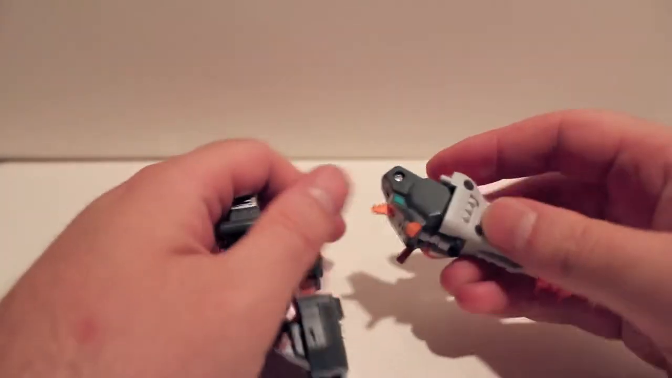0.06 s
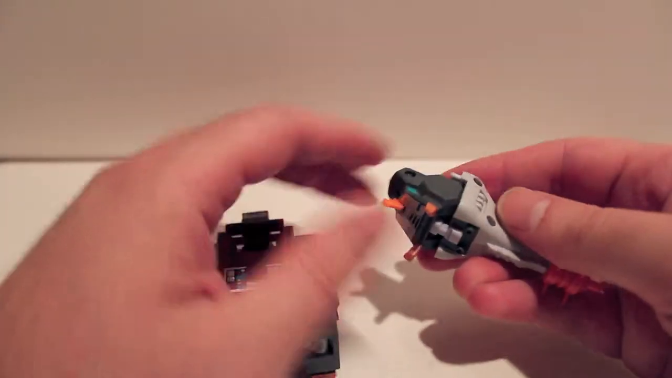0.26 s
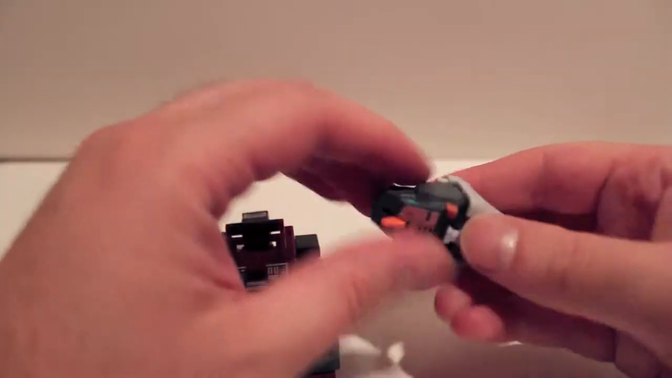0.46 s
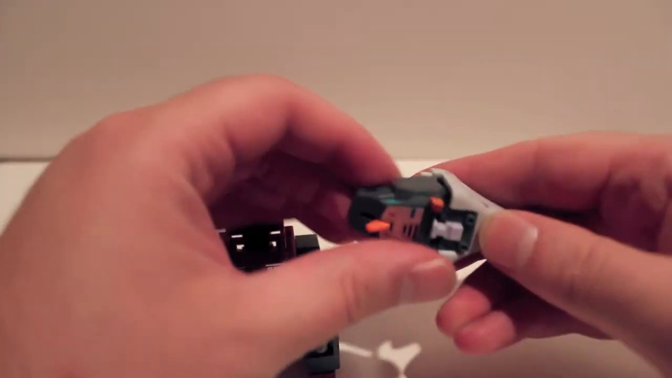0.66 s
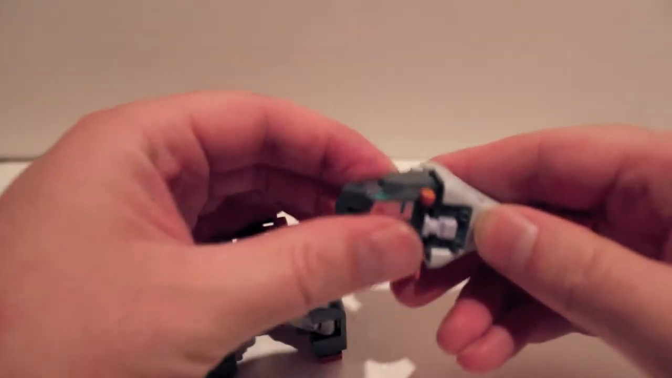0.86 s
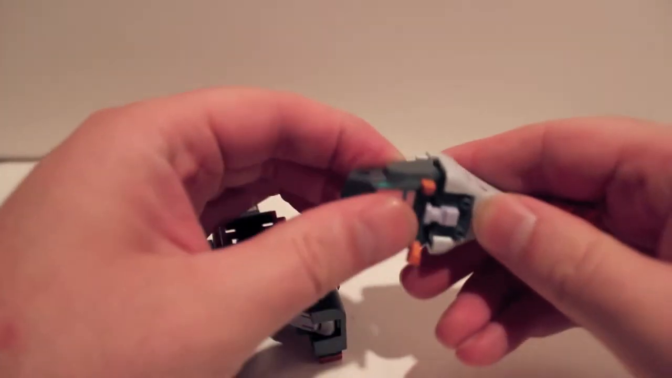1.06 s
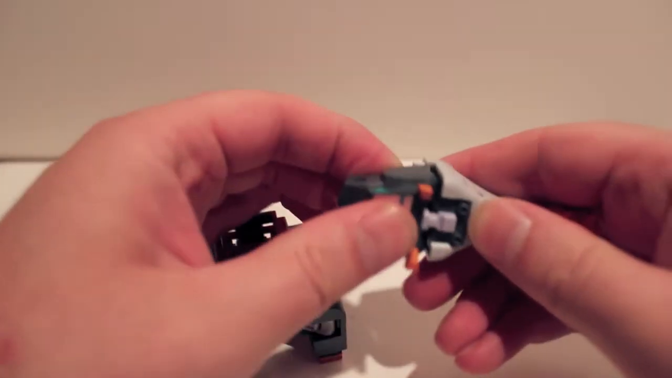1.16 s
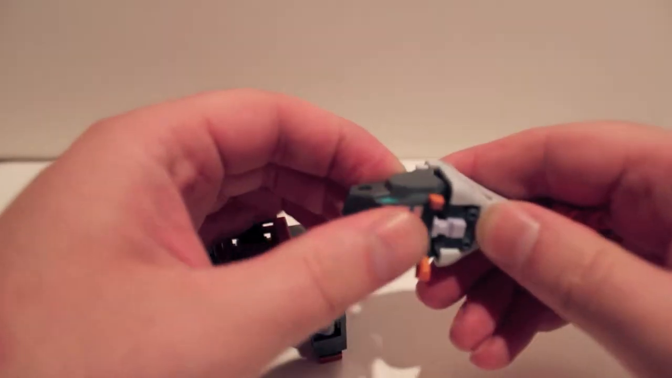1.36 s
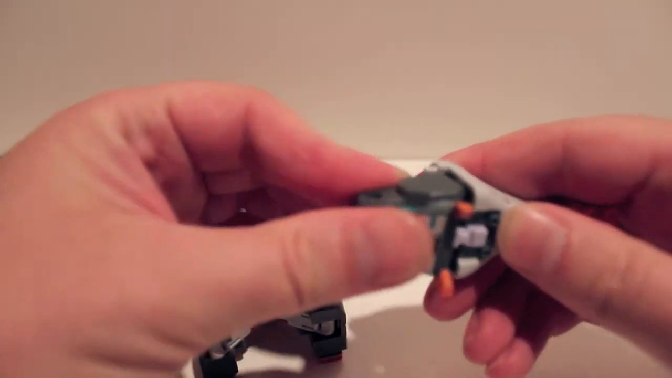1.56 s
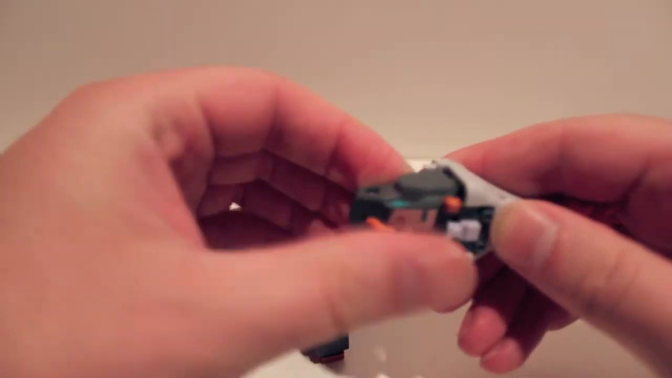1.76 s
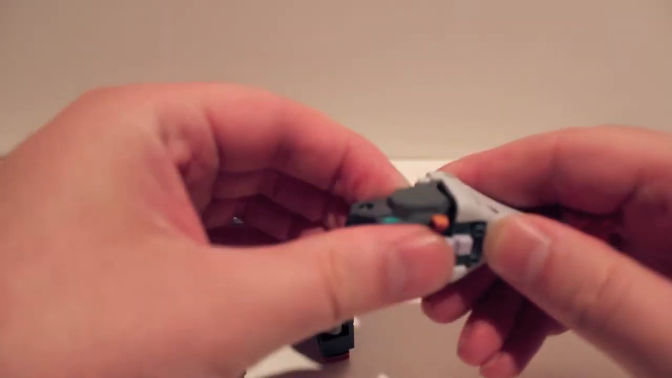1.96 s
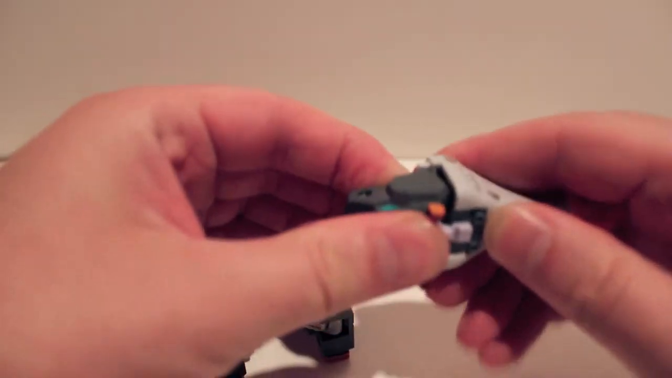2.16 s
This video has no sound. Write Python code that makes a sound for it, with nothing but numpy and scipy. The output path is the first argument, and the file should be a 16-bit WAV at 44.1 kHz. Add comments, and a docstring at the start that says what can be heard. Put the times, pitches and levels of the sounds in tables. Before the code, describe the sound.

Small plastic toy part knocks hard on a tabletop, then fingers rub and click another piece

```python
"""A slow-beating hum (two sines), a low rumble and steady air (coloured noise) lie under a small, quiet room.
Two light knocks and a soft rub lead to one hard knock and a bounce of a plastic toy part put down on a table
close to the microphone: contact pulses ring tabletop modes, and noise bursts make the plastic crack.
Fingers then slide and squeak over a second part (stroked noise, wide and narrow), with small clicks from its
joints (short noise bursts); the rumble swells after the first second."""
import sys
import numpy as np
from scipy import signal
from scipy.fft import rfft, irfft
from scipy.io import wavfile

SR = 44100
rng = np.random.default_rng(int(sys.argv[2]) if len(sys.argv) > 2 else 0)


def bounce(signal):
    """Save signal as a 16-bit WAV file at the path given by the first command-line argument."""
    frames = np.transpose(np.atleast_2d(signal))
    limited = np.clip(frames, -1, 1)
    pcm = np.round(limited * 32767).astype(np.int16)
    wavfile.write(sys.argv[1], SR, pcm)


N = 97020  # samples, 2.2 s


def undb(db):
    """Decibels to gain."""
    return 10 ** (np.asarray(db) / 20)


def unit(x):
    """Scale to rms 1."""
    return x / np.sqrt(np.mean(x ** 2) + 1e-24)


def on_log(hz, points):
    """Read a curve of (Hz, value) points on a log-frequency axis."""
    point_hz, value = np.array(points, float).T
    return np.interp(np.log(hz + 1e-3), np.log(point_hz), value)


def colour(x, points, tilt_db=0):
    """Multiply a signal's spectrum by a curve, tilted by dB per octave; rms 1."""
    hz = np.arange(N // 2 + 1) * SR / N
    gain = undb(on_log(hz, points) + tilt_db * np.log2(hz + 1))
    return unit(irfft(rfft(x) * gain, N))


def band_noise(hz, width_hz):
    """Noise through a resonance applied twice; rms 1."""
    f = np.arange(1, N // 2 + 2) * SR / N  # starts one bin up to avoid dividing by zero
    detuning = (f * f - hz * hz) / (f * width_hz)
    return unit(irfft(rfft(rng.standard_normal(N)) / (1 + detuning ** 2), N))


def fade(start_s, decay_s):
    """Sudden start and exponential decay; decay_s is the time to fall to 1/e."""
    age = np.arange(N) / SR - start_s
    return (age >= 0) * np.exp(-np.maximum(age, 0) / decay_s)


def swell(peak_s, rise_s, fall_s):
    """A smooth bell-shaped stroke with its own rise and fall."""
    age = np.arange(N) / SR - peak_s
    return np.exp(-(age / np.where(age < 0, rise_s, fall_s)) ** 2)


# colour of the room air: pitch_hz, level_db (per Hz, relative)
AIR_COLOUR = [(20, -15), (100, -1), (300, 2.5), (600, -5), (1200, -8), (2500, -14), (5000, -18),
              (10000, -21.5), (16000, -24.5)]
AIR_DB = -53


def air():
    """Steady broadband noise of the quiet room, weaker towards the treble."""
    return undb(AIR_DB) * colour(rng.standard_normal(N), AIR_COLOUR)


HUM_HZ, HUM_DB = 58, -48.5
SECOND_HUM_DB = -5  # relative to the first hum
BEAT_HZ, BEAT_NULL_S = 0.81, 0.52  # beat rate, and a moment when the hum is weakest


def hum():
    """Two nearly equal motor hums drift in and out of phase, so their sum beats."""
    age = np.arange(N) / SR - BEAT_NULL_S
    first = np.sin(2 * np.pi * HUM_HZ * age)
    second = undb(SECOND_HUM_DB) * np.sin(2 * np.pi * (HUM_HZ - BEAT_HZ) * age)
    return np.sqrt(2) * undb(HUM_DB) * (first - second)  # sqrt(2): HUM_DB is the first hum's rms


# loudness path of the low rumble: time_s, level_db
RUMBLE_LEVEL = [(0, -53), (.55, -53.5), (.95, -50), (1.18, -41), (1.45, -43.5), (1.56, -45.5), (1.72, -41),
                (2.0, -46.5), (2.2, -46)]
# colour of the low rumble: pitch_hz, level_db (per Hz, relative)
RUMBLE_COLOUR = [(40, -20), (70, -4.5), (88, -1.5), (118, 0), (134, 11.5), (150, 1.5), (175, -15),
                 (220, -9.5), (400, -37), (900, -78)]


def rumble():
    """Low-pitched noise whose level rises and falls along a path."""
    time_s, level_db = np.array(RUMBLE_LEVEL).T
    level = undb(np.interp(np.arange(N) / SR, time_s, level_db))
    return level * colour(rng.standard_normal(N), RUMBLE_COLOUR)


# reverberation of the small room: pitch_hz, t60_s (time to fall by 60 dB)
ROOM_T60 = [(150, .17), (400, .22), (1200, .25), (2500, .23), (6000, .16), (12000, .13)]
# colour of the reflections: pitch_hz, level_db (relative)
ROOM_COLOUR = [(100, -12), (300, -6), (700, -6), (1500, 2), (2500, 2), (5000, -3), (12000, -8)]
ROOM_DB, ROOM_DELAY_S = -8, 0.005


def room(x):
    """Diffuse reflections: noise tails in octave bands, the middle lasting longest and the top dying first."""
    hz = np.arange(N // 2 + 1) * SR / N
    noise = rfft(rng.standard_normal(N))
    tail = 0
    for centre_hz in 125 * 2. ** np.arange(8):
        band_shape = np.maximum(1 - abs(np.log2((hz + 1) / centre_hz)), 0)
        band = irfft(noise * band_shape, N)
        decay = fade(ROOM_DELAY_S, on_log(centre_hz, ROOM_T60) / np.log(1000))
        decay = decay / np.sqrt(np.sum(decay ** 2))  # equal energy before the colour
        tail = tail + undb(on_log(centre_hz, ROOM_COLOUR)) * band * decay
    return undb(ROOM_DB) * signal.fftconvolve(x, tail)[:N]


# joints and tabs clicking: start_s, level_db, centre_hz, width_hz, decay_s
JOINT_CLICKS = [(0.0473, -27, 11340, 4114, 0.0006), (0.2108, -35, 10200, 7000, 0.00043),
                (0.5093, -30.5, 12700, 7110, 0.0007), (0.637, -43, 9400, 9100, 0.0056),
                (0.9305, -36, 12100, 11000, 0.001), (0.9336, -41, 510, 500, .005),
                (0.9747, -45, 6450, 9000, 0.0016), (1.0145, -58, 14100, 5000, 0.0023),
                (1.073, -54, 6000, 9000, .002), (1.6376, -40, 9900, 10000, 0.0011),
                (1.89, -38.5, 8150, 10100, 0.0014), (1.944, -41.5, 5970, 9000, 0.0025),
                (1.9796, -40.5, 6950, 10000, .001), (2.1273, -48, 6500, 11000, 0.0035)]


def clicks():
    """Tiny snaps of the joints, noise bursts damped at once by the fingers."""
    out = np.zeros(N)
    for start_s, level_db, centre_hz, width_hz, decay_s in JOINT_CLICKS:
        out += undb(level_db) * fade(start_s, decay_s) * band_noise(centre_hz, width_hz)
    return out


TICK_S, TICK_HZ, TICK_DB, TICK_LENGTH_S = 0.95, 2450, -49, 0.003  # length: rise, and again fall


def tick():
    """One brief pitched tick: a sine under a short bell-shaped swell."""
    tone = np.sin(2 * np.pi * TICK_HZ * np.arange(N) / SR)
    return undb(TICK_DB) * swell(TICK_S, TICK_LENGTH_S, TICK_LENGTH_S) * tone


# short squeaks of skin on plastic: peak_s, rise_s, fall_s, level_db, pitch_hz
SKIN_SQUEAKS = [(0.41, 0.036, 0.044, -62, 4480), (0.512, .018, 0.026, -47.5, 4410),
                (0.544, 0.0078, 0.009, -40.5, 4500), (0.632, 0.0088, 0.02, -52.5, 8400),
                (0.66, 0.036, 0.036, -61, 4370), (0.864, 0.011, 0.0078, -52.5, 4280),
                (0.905, 0.011, 0.0044, -50, 4330)]
SQUEAK_WIDTH_HZ = 280


def squeaks():
    """Where the skin grips, the friction narrows to a thin, rough squeak."""
    out = np.zeros(N)
    for peak_s, rise_s, fall_s, level_db, pitch_hz in SKIN_SQUEAKS:
        out += undb(level_db) * swell(peak_s, rise_s, fall_s) * band_noise(pitch_hz, SQUEAK_WIDTH_HZ)
    return out


# fingers sliding on plastic: peak_s, rise_s, fall_s, level_db, tilt_db (per octave)
FINGER_RUBS = [(0.07, 0.26, 0.16, -48.5, 6.5), (0.418, 0.044, 0.037, -52.5, 3),
               (0.536, 0.031, .025, -47, 2.5), (0.633, 0.027, 0.03, -53, 0),
               (0.865, 0.055, 0.064, -51.5, 7), (1.575, 0.12, 0.078, -48, 5.5),
               (1.79, 0.052, 0.072, -46, 5), (1.89, 0.052, 0.13, -51, 2.5)]
# colour of skin friction before the tilt: pitch_hz, level_db (per Hz, relative)
SKIN_COLOUR = [(800, -31), (2200, -1), (3150, 2.5), (4050, 1), (5800, -1.5), (7000, -6.5), (10500, -3.5),
               (14500, -8), (16000, -7)]
CATCHES_PER_S, CATCH_SPREAD_DB = 3200, 8.5
CATCH_SHARE = 0.76  # rms of the catches relative to the hiss
PALM_ECHO_S, PALM_ECHO_GAIN = 0.00113, -0.4


def rubs():
    """Skin slides over the plastic: a fine hiss with tiny catches, coloured by an echo inside the cupped hands."""
    hits = rng.random(N) < CATCHES_PER_S / SR
    strength = undb(CATCH_SPREAD_DB * np.minimum(rng.exponential(size=N), 4))
    catches = hits * rng.choice([-1, 1], N) * strength
    friction = rng.standard_normal(N) + CATCH_SHARE * unit(catches)
    friction = friction + PALM_ECHO_GAIN * np.roll(friction, int(PALM_ECHO_S * SR))
    out = np.zeros(N)
    for peak_s, rise_s, fall_s, level_db, tilt_db in FINGER_RUBS:
        out += undb(level_db) * swell(peak_s, rise_s, fall_s) * colour(friction, SKIN_COLOUR, tilt_db)
    return out


# resonances of the tabletop, one entry per mode: pitch_hz
MODE_HZ = [134, 252, 283, 309, 337, 459, 487, 522, 672, 699, 727, 767, 856, 1256, 1344, 1410, 1497, 1608,
           1965]
# their strengths: level_db
MODE_DB = [-24, -20.5, -25, -21.5, -20, -16.5, -19, -16.5, -19, -15, -22.5, -21, -19, -18.5, -26, -21.5,
           -16, -34.5, -34]
# their ringing times: t60_s (time to fall by 60 dB)
MODE_T60 = [.22, .3, .2, .3, .21, .19, .13, .09, .09, .1, .09, .08, .11, .1, .08, .07, .07, .1, .06]
THUD_DB, THUD_HZ, THUD_S = -3, 650, 0.002  # short thud added to the modes
TABLE_LOW_HZ = 124


def tabletop():
    """Response of the tabletop to a push: decaying modes and a thud, which radiate no deep bass."""
    t = np.arange(N) / SR
    ring = undb(THUD_DB) * np.sin(2 * np.pi * THUD_HZ * t) * fade(0, THUD_S)
    for pitch_hz, level_db, t60_s in zip(MODE_HZ, MODE_DB, MODE_T60):
        ring += undb(level_db) * np.sin(2 * np.pi * pitch_hz * t) * fade(0, t60_s / np.log(1000))
    low_cut = signal.butter(4, TABLE_LOW_HZ, "high", fs=SR, output="sos")
    return signal.sosfilt(low_cut, ring)


# plastic meeting the table: start_s, level_db (push), contact_ms, crack_db
TABLE_KNOCKS = [(0.001, -10.5, 2.82, -38.5), (0.0185, -34.5, 0.48, -45.5), (0.0332, -22.5, 2.7, -45.5),
                (0.1975, 0, 0.58, -13), (0.2052, 0, 1.74, -46), (0.2362, -16, 0.42, -26.5),
                (0.2379, -12.5, 0.47, -40.5), (0.2574, -23, 0.14, -33.5), (0.2667, -16, 1.97, -60)]
# colour of the plastic crack: pitch_hz, level_db (per Hz, relative)
CRACK_COLOUR = [(900, -22), (1400, 12.5), (1950, -1), (2700, -4.5), (4000, -4), (6200, -3.5), (7500, 2.5),
                (8600, -4), (12500, -6), (13800, 1), (16000, -12)]
CRACK_S = 0.0023  # decay
RATTLE_DB, RATTLE_S = -22, 0.018  # relative to the crack; decay
SHELL_HZ, SHELL_WIDTH_HZ, SHELL_DB, SHELL_S = 1700, 1100, -4, 0.007  # level relative to the crack; decay


def knocks():
    """Each contact pushes the tabletop into its modes; the hollow plastic shell cracks, rings and rattles briefly."""
    t = np.arange(N) / SR
    push, crack, shell = np.zeros((3, N))
    for start_s, level_db, contact_ms, crack_db in TABLE_KNOCKS:
        progress = np.clip((t - start_s) / (contact_ms / 1000), 0, 1)
        force = np.sin(np.pi * progress) ** 2
        push += undb(level_db) * force / force.sum()  # longer contact: softer, same impulse
        crack += undb(crack_db) * (fade(start_s, CRACK_S) + undb(RATTLE_DB) * fade(start_s, RATTLE_S))
        shell += undb(crack_db + SHELL_DB) * fade(start_s, SHELL_S)
    table = signal.fftconvolve(push, tabletop())[:N]
    crack_sound = crack * colour(rng.standard_normal(N), CRACK_COLOUR)
    shell_sound = shell * band_noise(SHELL_HZ, SHELL_WIDTH_HZ)
    return table + crack_sound + shell_sound


def scene():
    """The handling, its reflections and the background."""
    background = air() + hum() + rumble()
    near = clicks() + tick() + squeaks() + rubs() + knocks()
    return (background + room(near) + near)[None]


LOW_CUT_HZ, TOP_HZ = 42, 15800


def record(dry):
    """The recorder flattens peaks beyond full scale, then cuts the deepest bass and the top."""
    clipped = np.clip(dry, -1, 1)
    low_cut = signal.butter(4, LOW_CUT_HZ, "high", fs=SR, output="sos")
    top_cut = signal.ellip(10, 0.2, 70, TOP_HZ, fs=SR, output="sos")  # 0.2 dB ripple, 70 dB rejection
    return signal.sosfilt(top_cut, signal.sosfilt(low_cut, clipped))


dry = scene()
out = record(dry)
bounce(out)
```